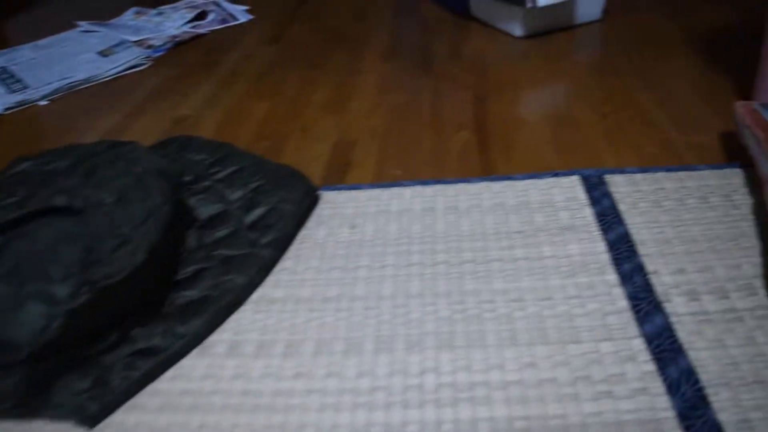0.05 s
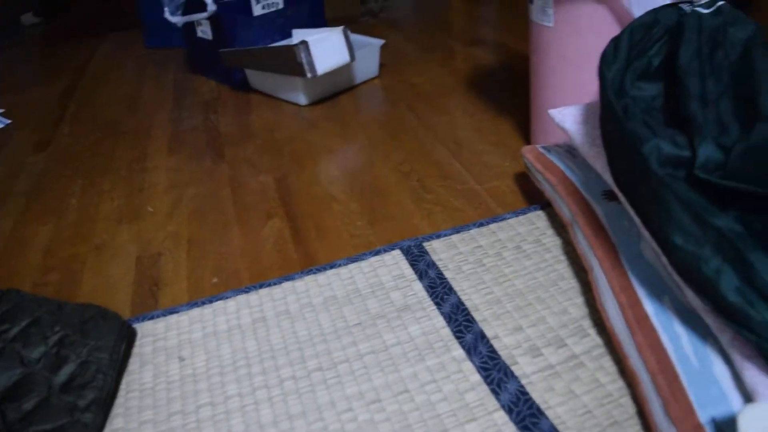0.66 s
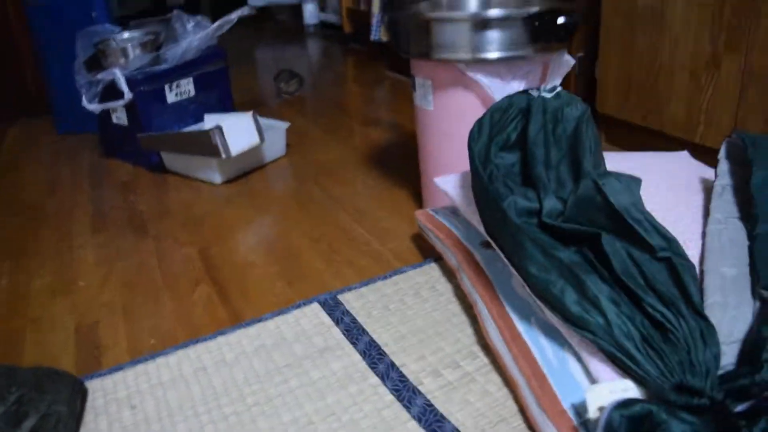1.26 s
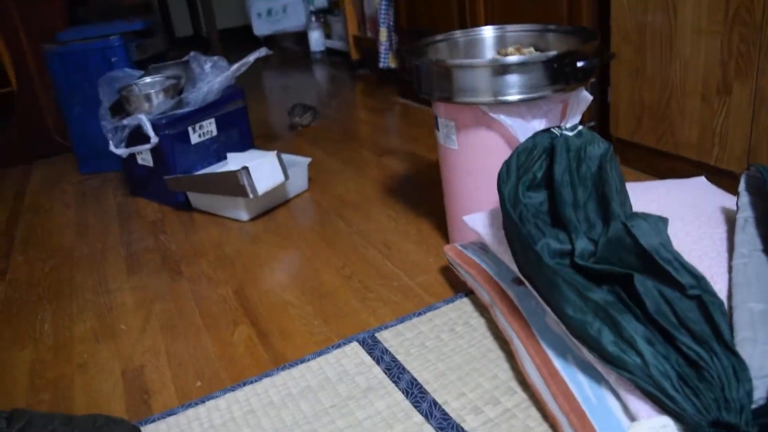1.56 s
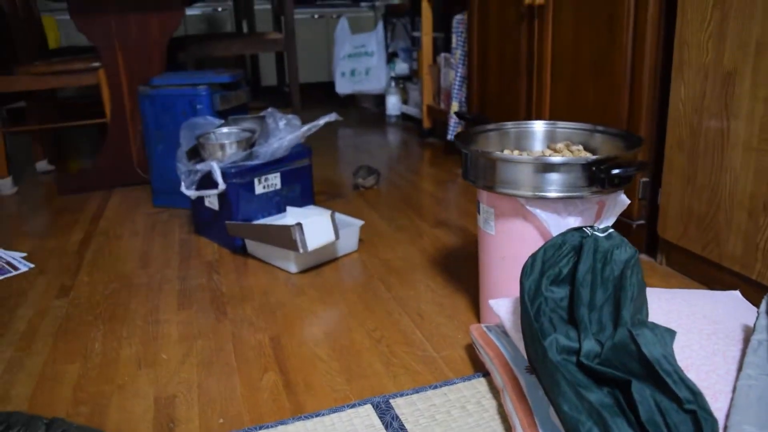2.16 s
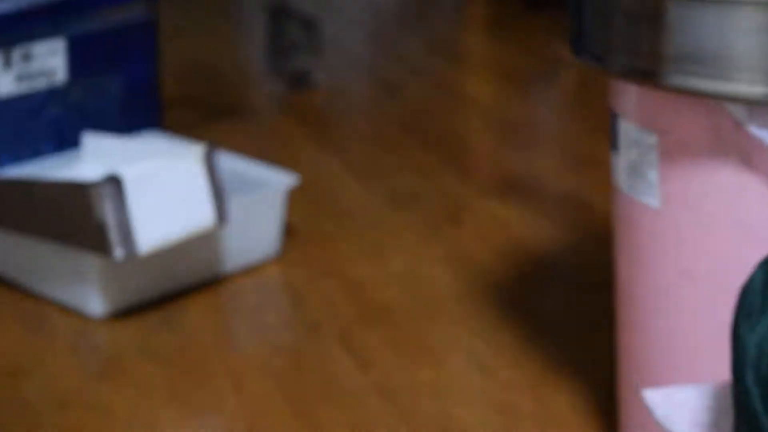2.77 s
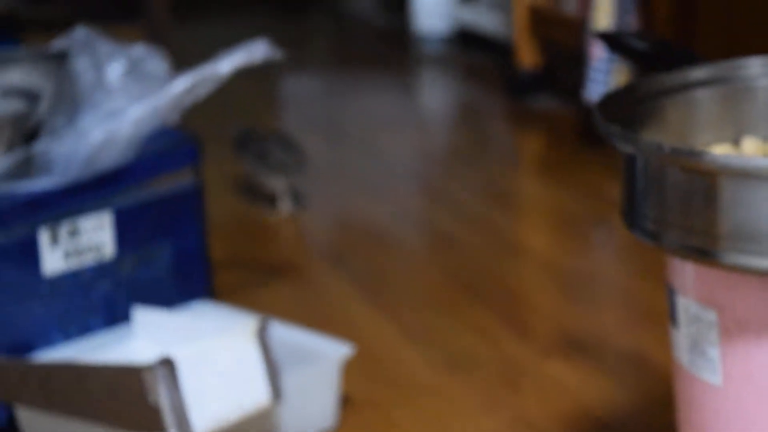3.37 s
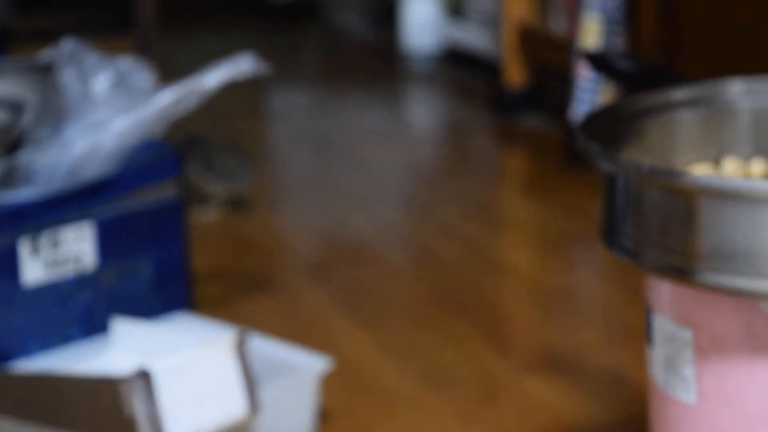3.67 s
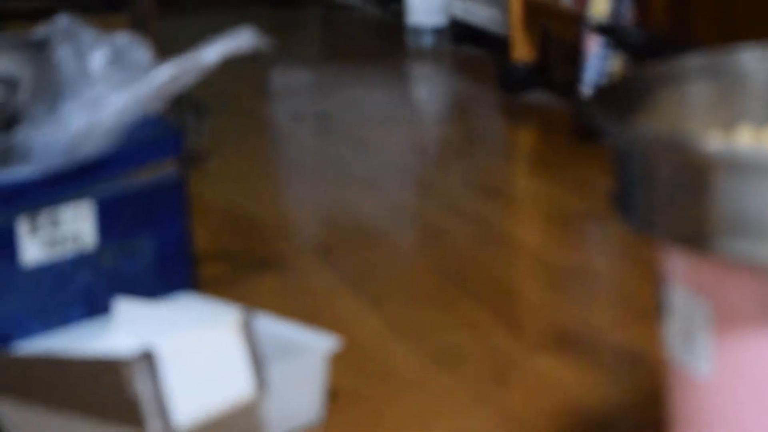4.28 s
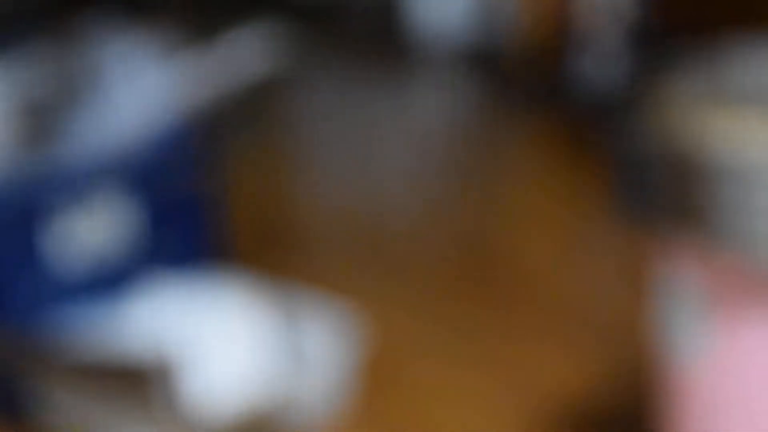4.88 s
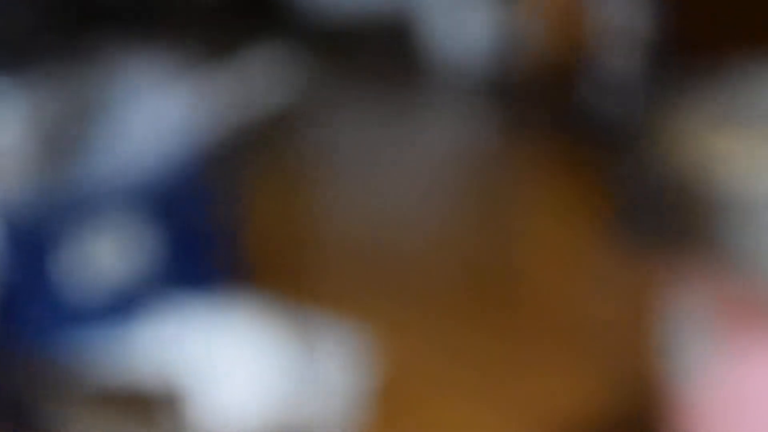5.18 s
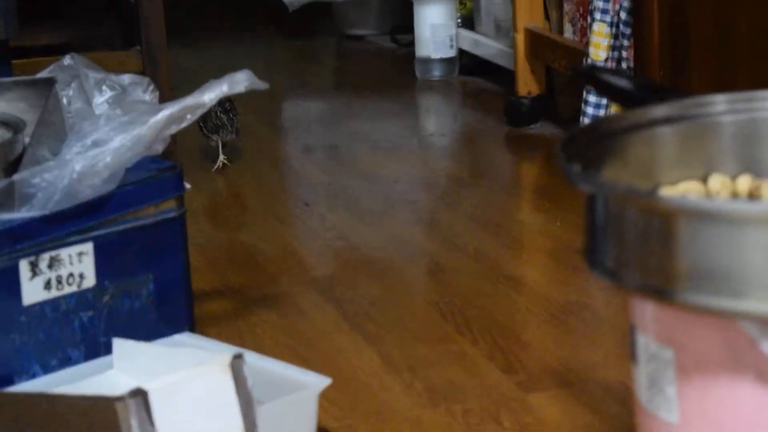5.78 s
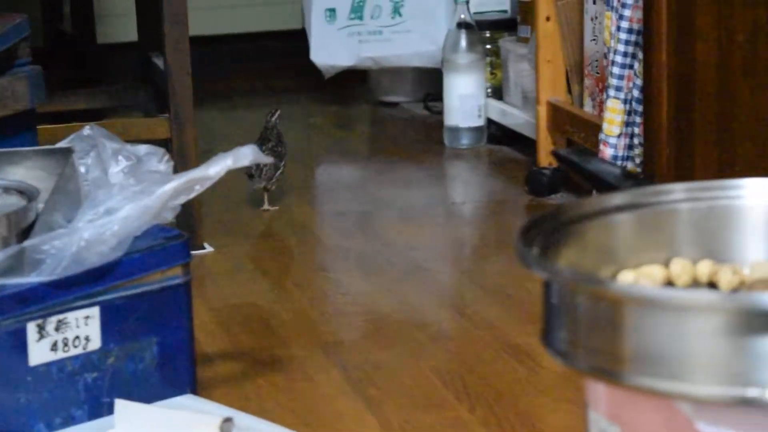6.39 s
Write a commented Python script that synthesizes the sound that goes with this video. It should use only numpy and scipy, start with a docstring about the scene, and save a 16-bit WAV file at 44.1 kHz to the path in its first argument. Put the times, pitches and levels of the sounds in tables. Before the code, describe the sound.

Fingers rustle on a handheld camera, its zoom scrapes and knocks, and the focus motor whirrs back and forth with sharp clicks.

```python
"""Camera handling, zoom and autofocus

A handheld camera in a quiet room hears its own body: the rubber grip pops and fingers rub the shell.
The zoom ring scrapes round and knocks against its stop, ringing the hollow barrel.
Then the autofocus hunts: its motor ticks into motion, the gears whirr along,
and twice the mechanism hits the end of its travel with a hard click."""
import sys
import numpy as np
from scipy import signal
from scipy.fft import rfft, irfft
from scipy.io import wavfile

SR = 44100
rng = np.random.default_rng(int(sys.argv[2]) if len(sys.argv) > 2 else 0)


def store_wav(level_fs):
    """Save 16-bit WAV to argv[1]."""
    pcm = np.round(np.clip(np.atleast_2d(level_fs), -1, 1) * 32767)
    wavfile.write(sys.argv[1], SR, pcm.T.astype(np.int16))


N = 292824
TIME = np.arange(N) / SR
HIT_TIME = np.arange(4096) / SR
BINS = np.fft.rfftfreq(8192, 1 / SR)

# Tone curves, all with columns: freq_hz, level_db
ROOM_TONE = [(15, -76), (25, -35), (70, -26.5), (114, -17.5), (326, -9), (394, -5.5), (451, -7.5),
             (489, -10), (641, -6), (2050, -11.5), (4030, -18.5), (4370, -20.5), (4740, -19.5),
             (16000, -38)]
SHELL_TONE = [(30, -79), (70, -15), (150, -10.5), (300, 0), (500, 7.5), (850, 2), (1100, 3), (2000, -12),
              (3500, -35), (8000, -53), (16000, -52)]  # the shell under pressure
SKIN_TONE = [(100, -17.5), (700, 0.5), (1400, 4.5), (2200, 4), (3200, -0.5), (5000, -4), (7000, -8.5),
             (9500, -11.5), (13000, -20), (16000, -27)]  # sliding skin
POP_TONE = [(40, -58), (130, -23), (380, 4), (800, 0.5), (1300, 1), (2000, -15.5), (3500, -31), (7000, -39),
            (16000, -54)]  # rubber grip
CRACK_TONE = [(30, -6), (100, -13), (300, -12), (1000, -26), (3500, 18), (5500, 13.5), (7000, -4),
              (8000, -7), (10000, -3), (16000, -18)]  # bare contact of a barrel knock
ZOOM_TONE = [(30, -42), (100, -34), (200, -18), (300, -11), (470, -4.5), (580, -11), (850, -6.5),
             (1200, -9.5), (2000, -8.5), (2400, -13.5), (3300, -7.5), (4300, -10.5), (5200, -19.5),
             (9000, -22.5), (16000, -37.5)]  # sliding ring
CLICK_TONE = [(40, -47), (250, -6), (800, -19), (1300, -9.5), (2100, -3), (2800, 1.5), (4000, -3),
              (5200, -7.5), (7500, -12), (10500, -18), (12400, -30.5), (14000, -31), (16000, -52)]  # contacts in the focus drive
TEETH_TONE = [(40, -53), (300, -17), (900, -11), (1250, -0.5), (1650, 1), (2100, 1), (2320, -5.5),
              (2900, 0), (3900, -2.5), (4900, -18.5), (8000, -27.5), (12300, -30), (13200, -36),
              (16000, -43)]  # meshing gear teeth
RUMBLE_TONE = [(40, -42), (85, -33), (140, -6.5), (350, -4.5), (600, -11.5), (900, -11.5), (1130, 1),
               (1400, -2), (1900, 0), (3000, -24), (16000, -72)]  # output gear in the lens body

# The hand strokes the shell: start_s, end_s, press_db, hiss_db, rise_db_per_s, hiss_swell_db_per_s
STROKES = [(0.102, 0.184, -44.5, -55, 130, 0), (0.226, 0.29, -49, -41.5, 1500, -5),
           (.34, 0.403, -52.5, -52, 300, -30), (.47, 0.916, -55.5, -58, 100, -3),
           (1.197, 1.284, -47, -53.5, 106, 78), (1.34, 1.486, -44, -45, 80, 40),
           (1.653, 1.707, -49, -47, 190, 0), (2.286, 2.47, -64, -56.5, 300, -2)]
# The grip pops under the fingers: start_s, peak_db
GRIP_POPS = [(0.0663, -28), (0.087, -29), (0.1113, -15), (.1985, -26), (0.283, -30), (.344, -29),
             (1.272, -31.5), (1.948, -43.5)]
# A finger catches, taps or slips, and at the end a button ticks: start_s, level_db, rise_s, t60_s, pitch_hz,
# width_hz
SLIPS_AND_TICKS = [(.083, -43, .003, 0.023, 2860, 400), (.093, -53.5, .01, .5, 135, 45),
                   (.113, -44, 0.0031, 0.069, 690, 700), (.121, -34, .0048, .12, 735, 775),
                   (.127, -50, .007, 0.097, 3400, 700), (.222, -28.5, 0.0097, 0.16, 2080, 560),
                   (.24, -40, 0.057, 0.22, 2220, 2540), (.481, -50, .004, .14, 2780, 2020),
                   (.606, -53.5, 0.0043, .05, 210, 150), (.776, -42.5, .0005, .0086, 6600, 4000),
                   (1.073, -48.5, .0022, 0.14, 900, 1180), (1.213, -45, .008, .1, 573, 600),
                   (1.218, -49, .004, 0.14, 2780, 2500), (1.661, -54.5, 0.0063, .28, 73, 28),
                   (2.065, -41, .0006, .13, 2350, 700), (2.066, -43, .001, .22, 487, 330),
                   (2.251, -45, .002, .022, 343, 300), (2.277, -38.5, .012, .055, 1000, 1100),
                   (2.442, -43, 0.0046, .041, 665, 990), (2.625, -36, 0.017, 0.13, 470, 260),
                   (2.908, -51, .0055, 0.094, 960, 900), (2.975, -58.5, .02, .08, 4060, 900),
                   (3.336, -58.5, 0.0066, 0.27, 2340, 900), (6.193, -36.5, 0.00049, 0.013, 2200, 1700)]
# The barrel knocks in its play and on its stop: start_s, level_db, rise_s, tilt_db_per_octave
BARREL_KNOCKS = [(2.2809, -34.5, 0.0021, -2), (2.3029, -38, 0.0017, -0.3), (2.4726, -31.5, .002, -2.5),
                 (2.5152, -30.5, 0.0017, -2), (2.8035, -16.5, 0.003, 0), (2.8162, -37, 0.0023, -10.5),
                 (2.8592, -45.5, 0.0011, -2), (3.396, -50, 0.0016, -1.5)]
# Modes of the zoom barrel: pitch_hz, level_db, t60_s
BARREL_MODES = [(176, -33, 0.044), (361, -7.5, 0.016), (712, -10, 0.03), (886, -2.5, 0.011),
                (1156, -9, 0.023), (1450, -14, 0.023), (1720, -8, 0.016), (2060, -5.5, 0.016),
                (2650, -7.5, 0.015), (3330, 3.5, 0.011), (3860, -7, .015), (4240, -10, 0.018),
                (4740, -10, 0.011), (5300, -11, 0.0081), (6850, -6.5, 0.0065), (9800, -22, 0.0066)]
# Turns of the zoom ring: start_s, end_s, level_db, swell_db_per_s
ZOOM_TURNS = [(2.42, 2.47, -60, 0), (2.518, 2.803, -39.5, -10.5), (2.88, 2.891, -56, 0)]
# The sliding seal sings faintly: pitch_hz, width_hz, lift_db
SEAL_SQUEAL = [(4270, 380, 8)]
# Resonances of the focus mechanism: pitch_hz, width_hz, lift_db
LENS_RESONANCES = [(438, 80, 7.5), (770, 114, 7.5), (1142, 180, 11), (1777, 41, 3), (2080, 140, 4),
                   (2675, 150, 5.5), (3343, 135, 6.5), (3660, 92, 8), (4064, 150, 6.5), (4336, 190, 8),
                   (4910, 320, 13.5), (5240, 240, 9.5), (5710, 210, 6.5), (6210, 200, 8.5),
                   (7020, 270, 10.5), (7470, 200, 7.5), (8090, 350, 9.5), (8400, 290, 0), (9250, 220, 7),
                   (10300, 270, 7.5), (11100, 300, 4)]
# A focus move creeps, shifts up, runs, brakes and stops; two hit the end unbraked:
# start_s, shift_s, top_speed_s, brake_s, stop_s, start_db, shift_db, stop_db, creep_db, run_db
FOCUS_MOVES = [(3.5138, 3.607, 3.622, 3.622, 3.7496, -39, -36.5, -38, -52, -54),
               (3.7902, 3.905, 3.952, 4.208, 4.208, -44, -37, -23.3, -57.5, -44.5),
               (4.263, 4.3763, 4.437, 4.992, 4.992, -40, -37.5, -24, -56.5, -40.7),
               (5.0641, 5.109, 5.115, 5.595, 5.793, -36.5, -41, -37.5, -48.5, -41.7),
               (5.818, 5.9292, 5.93, 5.93, 5.9957, -43, -37, -39, -56.5, -62)]


def amp(db):
    """Decibels to gain."""
    return 10 ** (np.asarray(db) / 20)


def unit(x):
    """Scales to rms 1."""
    return x / np.sqrt(np.mean(x ** 2) + 1e-20)


def add(mix, start_s, sound):
    """Drops a sound into the mix."""
    part = mix[max(round(start_s * SR), 0):][:len(sound)]
    part += sound[:len(part)]


def eq_curve(tone, resonances=()):
    """A smooth spectrum in dB, lifted at each resonance."""
    hz, db = np.transpose(tone)
    smooth = np.interp(np.log(BINS + 1), np.log(hz + 1), db)
    return smooth + sum(lift / (1 + (2 * (BINS - f) / width) ** 2) for f, width, lift in resonances)


def tilted(curve_db, db_per_octave):
    """Tips a curve around the upper mids: harder contacts are brighter."""
    return curve_db + db_per_octave * np.log2((BINS + 300) / 3000)


def resonate(x, curve_db):
    """Plays x through a minimum-phase body of energy 1 with the given spectrum."""
    log_gain = np.log(amp(np.r_[curve_db, curve_db[-2:0:-1]]))
    spectrum = np.exp(np.conj(signal.hilbert(log_gain)))
    response = np.fft.ifft(spectrum).real[:len(BINS) // 2]
    return signal.fftconvolve(x, response / np.linalg.norm(response))[:len(x)]


def held(start, end, rise_db_per_s, fall_db_per_s):
    """An envelope that reaches 1 by start, holds until end and dies away."""
    return amp(-rise_db_per_s * np.maximum(start - TIME, 0) - fall_db_per_s * np.maximum(TIME - end, 0))


def swell_db(start, end, db_per_s):
    """A level ramp from start to end, passing 0 dB halfway."""
    return db_per_s * (np.clip(TIME, start, end) - (start + end) / 2)


def friction(snags_per_s, snag_db, uneven_db, waver_hz=34):
    """Smooth sliding noise plus tiny snags, under a wavering pressure."""
    snags = rng.standard_normal(N) * (rng.random(N) < snags_per_s / SR)
    scrape = rng.standard_normal(N) + amp(snag_db) * unit(snags)
    lowpass = 1 / (1 + (np.fft.rfftfreq(N, 1 / SR) / waver_hz) ** 4)
    pressure = unit(irfft(rfft(rng.standard_normal(N)) * lowpass, N))
    return unit(scrape * amp(uneven_db * pressure))


def chatter(t60):
    """A contact that rattles for a few ms with no pitch of its own."""
    fade = amp(-60 * HIT_TIME / t60)
    burst = rng.standard_normal(len(HIT_TIME)) * fade
    for _ in range(6):  # flatten the spectrum, keep the burst short
        spectrum = rfft(burst)
        burst = irfft(spectrum / (abs(spectrum) + 1e-20)) * np.minimum(1, 2 * fade)
    return burst / np.linalg.norm(burst) * np.sqrt(SR / 200)  # the energy of 5 ms at rms 1


def room_air(level_db=-60):
    """A bed of faint, even room rush."""
    return amp(level_db) * resonate(rng.standard_normal(N), eq_curve(ROOM_TONE))


def hand_rub(grip_until_s=2.16, fall_db_per_s=150, murmur_trim_db=-3):
    """Pressure makes the shell murmur; sliding skin adds a fine hiss."""
    grip = held(0, grip_until_s, 0, fall_db_per_s)  # the hand is never quite still while aiming
    press, slide = amp(-58.5) * grip, amp(-63) * grip
    for start, end, press_db, hiss_db, rise, swell in STROKES:
        stroke = held(start, end, rise, fall_db_per_s)
        press = np.maximum(press, amp(press_db) * stroke)
        slide = np.maximum(slide, amp(hiss_db + swell_db(start, end, swell)) * stroke)
    murmur = resonate(friction(260, snag_db=-6, uneven_db=.9) * press, eq_curve(SHELL_TONE))
    hiss = resonate(friction(300, snag_db=-10, uneven_db=.53) * slide, eq_curve(SKIN_TONE))
    return amp(murmur_trim_db) * murmur + hiss


def grip_pops():
    """Dull, dead snaps of the rubber grip."""
    out = np.zeros(N)
    snap = resonate(signal.unit_impulse(len(BINS)), eq_curve(POP_TONE))
    for start, peak_db in GRIP_POPS:
        add(out, start, amp(peak_db) * snap / abs(snap).max())
    return out


def slips_and_ticks():
    """Short scuffs and ticks, each stirring one resonance of the shell."""
    out, t = np.zeros(N), np.arange(SR // 2) / SR
    for start, db, rise, t60, hz, width in SLIPS_AND_TICKS:
        envelope = np.minimum(t / rise, 1) * amp(-60 * np.maximum(t - rise, 0) / t60)
        hiss_db = -19.5 + 12 * np.log2(hz / 2000)  # higher slips hiss more
        resonance = 1 / (1 + ((BINS ** 2 - hz ** 2) / ((BINS + 1) * width * 1.52)) ** 2)
        colour = 20 * np.log10(resonance + amp(hiss_db + eq_curve(SKIN_TONE)))
        add(out, start, amp(db) * resonate(rng.standard_normal(len(t)) * envelope, colour))
    return out


def barrel_knocks(crack_db=-11, crack_t60=.0148, low_cut_hz=95):
    """Each blow cracks and sets the barrel ringing hollow, with no deep bass."""
    out = np.zeros(N)
    hz, mode_db, t60 = np.transpose(BARREL_MODES)[:, :, None]
    for start, db, rise, tilt in BARREL_KNOCKS:
        partials = np.sin(2 * np.pi * (hz * HIT_TIME + rng.random(hz.shape)))
        fade = amp(mode_db + tilt * np.log2(hz) - 60 * HIT_TIME / t60)
        attack = np.minimum(HIT_TIME / rise, 1)
        crack = resonate(chatter(crack_t60), tilted(eq_curve(CRACK_TONE), tilt))
        body = unit((partials * fade).sum(0) * attack) * np.std(crack)
        add(out, start, amp(db) * (body + amp(crack_db) * crack))
    return signal.sosfilt(signal.butter(2, low_cut_hz, "highpass", fs=SR, output="sos"), out)


def zoom_scrape(lift_db=3, lead_s=.047):
    """The ring breaks loose and slides with a grainy scrape, coloured by barrel and seal."""
    barrel = [(hz, np.log(1000) / np.pi / t60, lift_db) for hz, _, t60 in BARREL_MODES]
    sliding = np.zeros(N)
    for start, end, db, swell in ZOOM_TURNS:
        turn = held(start, end, rise_db_per_s=178, fall_db_per_s=650) * (TIME > start - lead_s)
        sliding += amp(db + swell_db(start, end, swell)) * turn
    scrape = friction(536, snag_db=-5, uneven_db=.42) * sliding
    return resonate(scrape, eq_curve(ZOOM_TONE, barrel + SEAL_SQUEAL))


def focus_clicks(dull_hz=4500, bright_s=.0058):
    """Contacts ring the focus mechanism as it starts, shifts and stops; their treble dies first."""
    out, colour = np.zeros(N), eq_curve(CLICK_TONE, LENS_RESONANCES)
    bright = np.exp(-(HIT_TIME / bright_s) ** 2)
    lowpass = signal.butter(2, dull_hz, fs=SR, output="sos")
    for start, shift, _, _, stop, start_db, shift_db, stop_db, *_ in FOCUS_MOVES:
        clicks = (start, start_db, .016, 7.6), (shift, shift_db, .021, 2.6), (stop, stop_db, .0207, 2.5)
        for at_s, db, t60, tilt in clicks:
            contact = chatter(t60)
            contact = bright * contact + (1 - bright) * signal.sosfiltfilt(lowpass, contact)
            add(out, at_s, amp(db) * resonate(contact, tilted(colour, tilt)))
    return out


def gear_whirr(turn_hz=8.57, throb_db=2.5, spin_up_db_per_s=302, brake_db_per_s=178):
    """Teeth rasp through the lens body; at speed the output gear adds a rumble, throbbing once a turn."""
    drive, throb = np.zeros(N), np.ones(N)
    for start, shift, top, brake, stop, *_, creep_db, run_db in FOCUS_MOVES:
        creep = amp(creep_db) * held(start, shift, 0, brake_db_per_s)
        run = amp(run_db) * held(top, brake, spin_up_db_per_s, brake_db_per_s)
        gate = (TIME > start) * held(start, stop, 0, fall_db_per_s=650)
        drive += np.maximum(creep, run) * gate
        gear_angle = 2 * np.pi * turn_hz * (TIME - shift)
        throb = np.where(TIME > start, amp(throb_db * np.cos(gear_angle)), throb)
    speed = np.sqrt(drive / amp(-40))  # about 1 at full speed
    rasp = friction(1200, snag_db=-2.6, uneven_db=.82) * drive
    grind = friction(300, snag_db=-2.5, uneven_db=.46) * drive * speed * unit(throb)
    teeth = resonate(rasp, eq_curve(TEETH_TONE, LENS_RESONANCES))
    rumble = resonate(grind, eq_curve(RUMBLE_TONE, LENS_RESONANCES))
    return amp(-1) * teeth + amp(-5) * rumble


def step_bursts(step_s):
    """Where the steps stand out: start_s, end_s, first_db, last_db, final_tilt_db_per_octave."""
    for start, shift, top, brake, stop, *_, creep_db, _ in FOCUS_MOVES:
        yield start + step_s, start + .0216, -51, -44, 0  # starting
        yield shift + step_s, top, -48, -57, -4.5  # shifting up
        yield brake, stop, creep_db - 8.5, creep_db - 14, -4.5  # braking


def motor_steps(step_hz=325.3, t60=.00704, jitter_s=.00003):
    """Near-identical steps strike the gears in a rasping buzz, looser when light or late in a burst."""
    out, colour = np.zeros(N), eq_curve(CLICK_TONE, LENS_RESONANCES)
    for start, end, first_db, last_db, tilt in step_bursts(1 / step_hz):
        repeated = chatter(t60)
        firmness = 1 / (1 + amp(-50 - first_db) ** 2)
        for at_s in np.arange(start, end, 1 / step_hz):
            progress = (at_s - start) / (end - start)
            alike = firmness * (1 - .5 * progress)
            contact = np.sqrt(alike) * repeated + np.sqrt(1 - alike) * chatter(t60)
            tick = resonate(contact, tilted(colour, tilt * progress ** 2))
            late_s = jitter_s * progress * rng.standard_normal()
            db = first_db + progress * (last_db - first_db)
            add(out, at_s + late_s, amp(db) * tick)
    return out


def room_reverb(x, t60=.17, wet_db=-22, predelay_s=.005):
    """Adds the short, weak tail of a furnished room."""
    t = np.arange(SR // 2) / SR
    tail = rng.standard_normal(len(t)) * amp(-60 * t / t60) * (t > predelay_s)
    return x + amp(wet_db) * signal.fftconvolve(x, tail / np.linalg.norm(tail))[:N]


def scene():
    """A close mono mix: all but the air reaches the microphone mostly through the camera body."""
    handling = hand_rub() + grip_pops() + slips_and_ticks()
    zoom = barrel_knocks() + zoom_scrape()
    focus = focus_clicks() + gear_whirr() + motor_steps()
    return (room_air() + handling + room_reverb(zoom + focus))[None]


def record(dry, low_cut_hz=38, high_cut_hz=16300):
    """The microphone's bass cut and the recorder's band limit."""
    thinned = signal.sosfilt(signal.butter(4, low_cut_hz, "highpass", fs=SR, output="sos"), dry)
    taps = signal.firwin(511, high_cut_hz, window=("kaiser", 9), fs=SR)
    return signal.oaconvolve(thinned, taps[None], "same")


dry = scene()
out = record(dry)
store_wav(out)
```